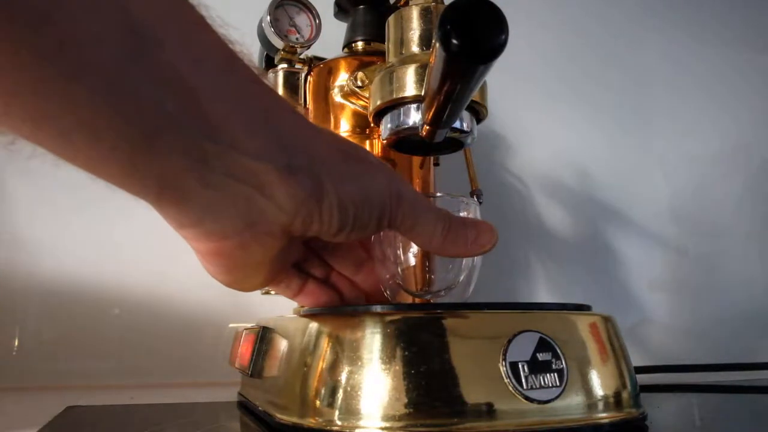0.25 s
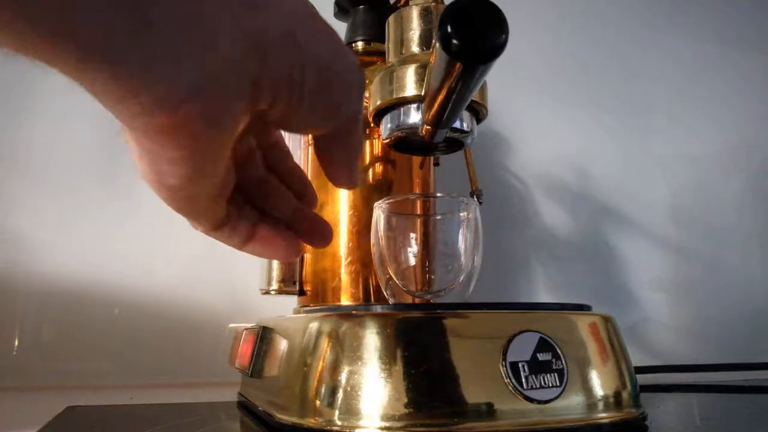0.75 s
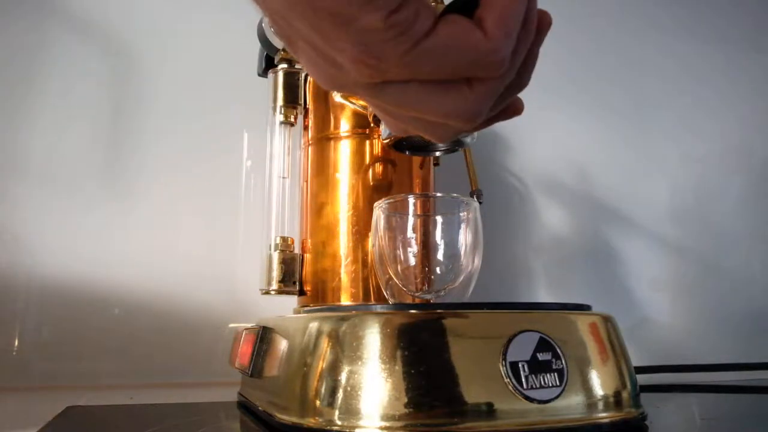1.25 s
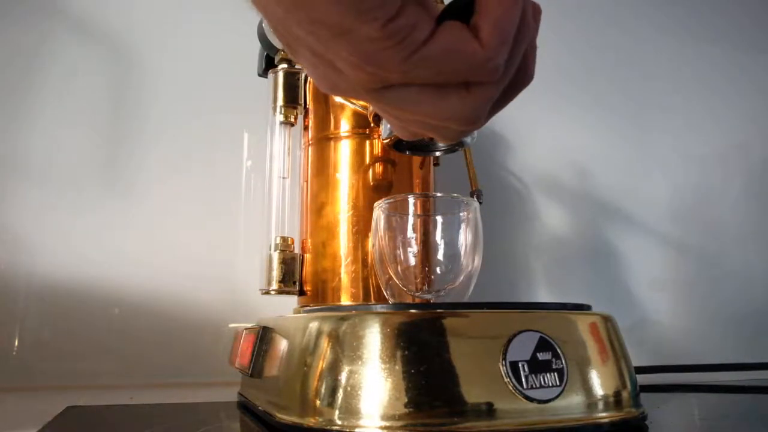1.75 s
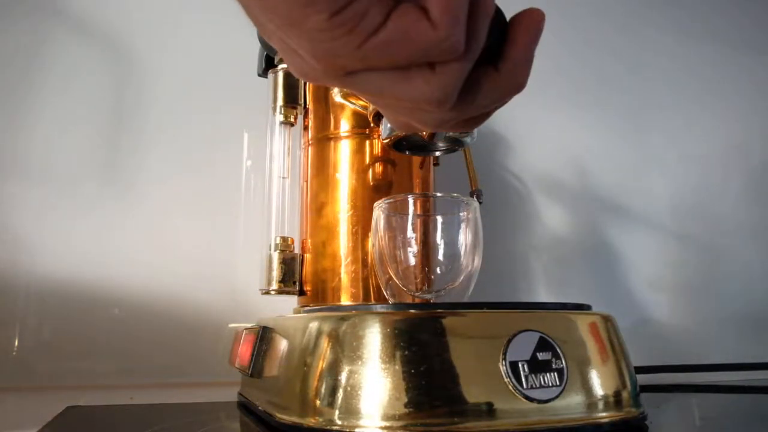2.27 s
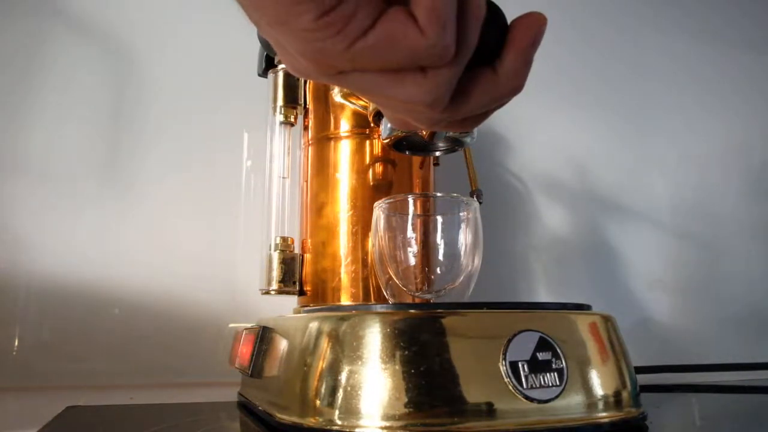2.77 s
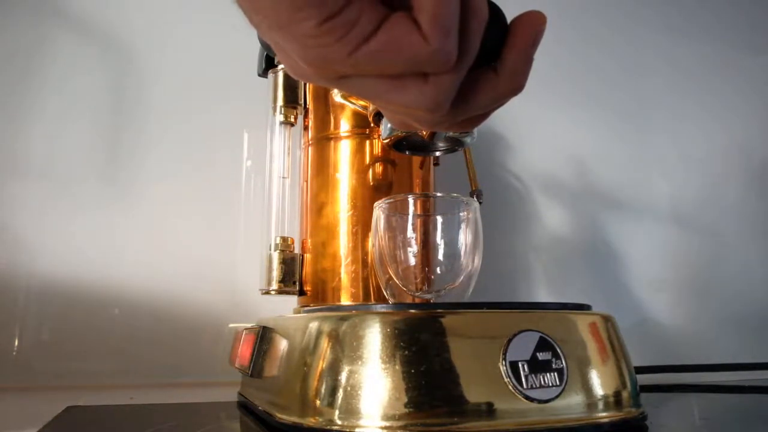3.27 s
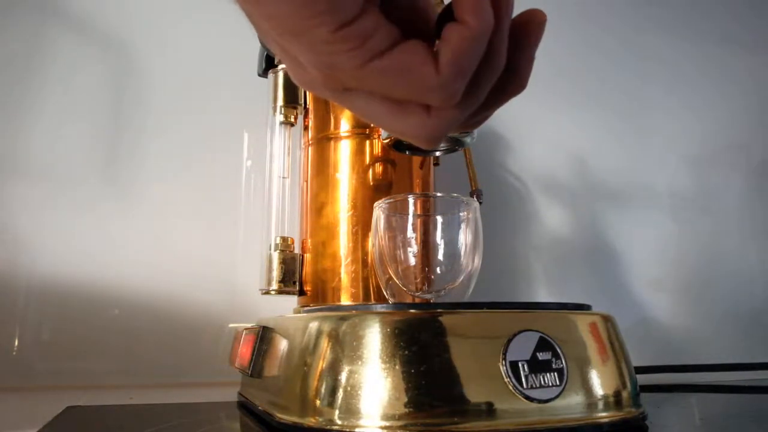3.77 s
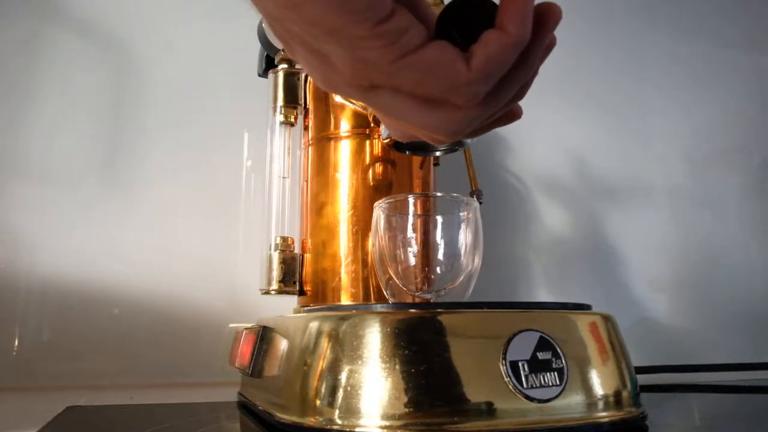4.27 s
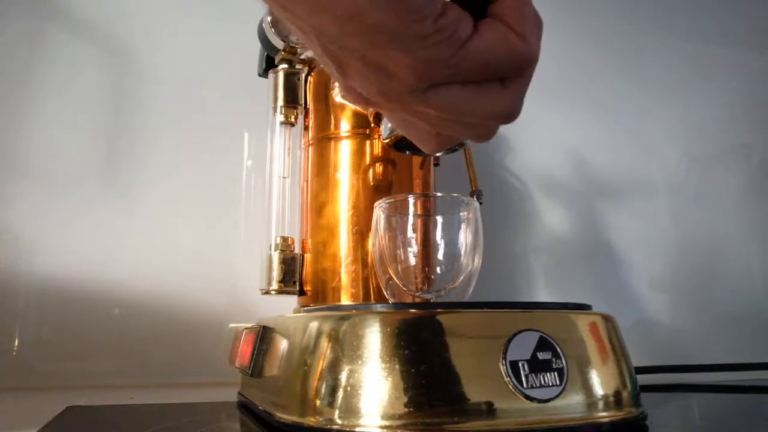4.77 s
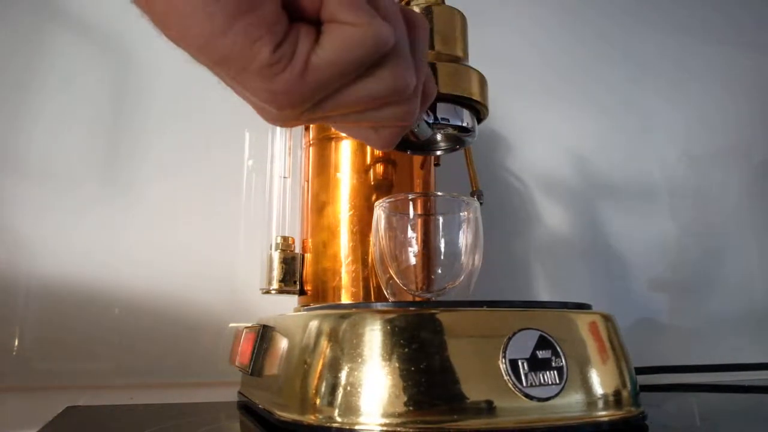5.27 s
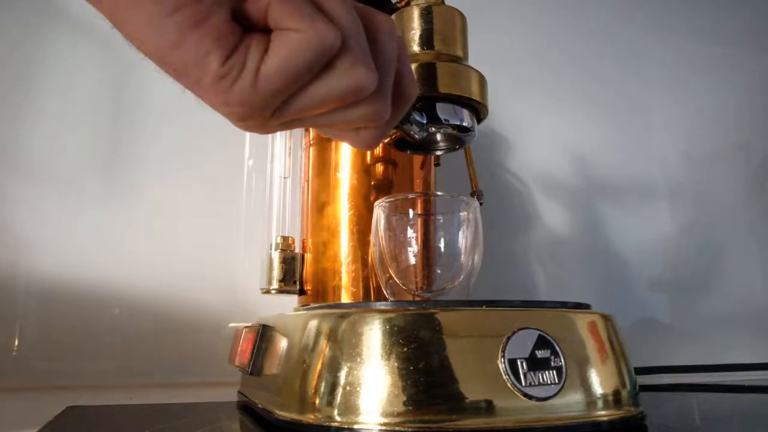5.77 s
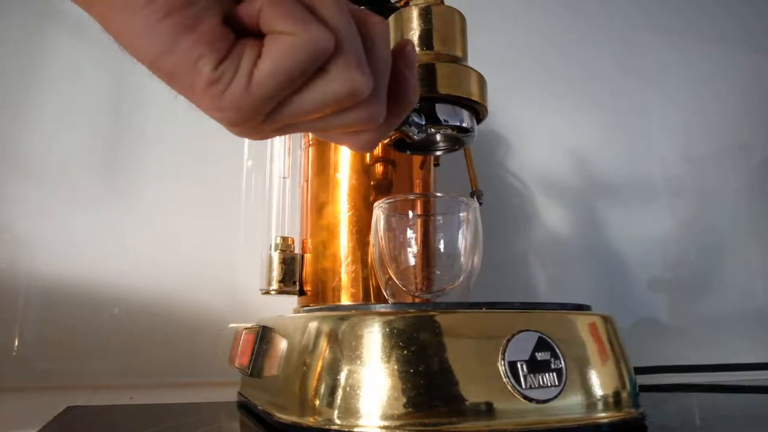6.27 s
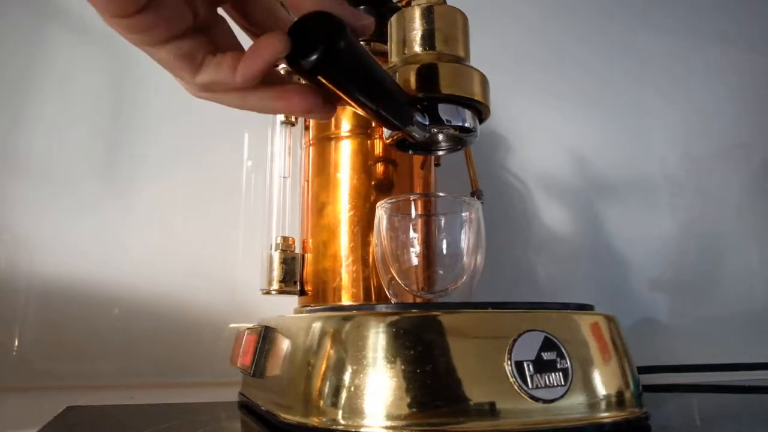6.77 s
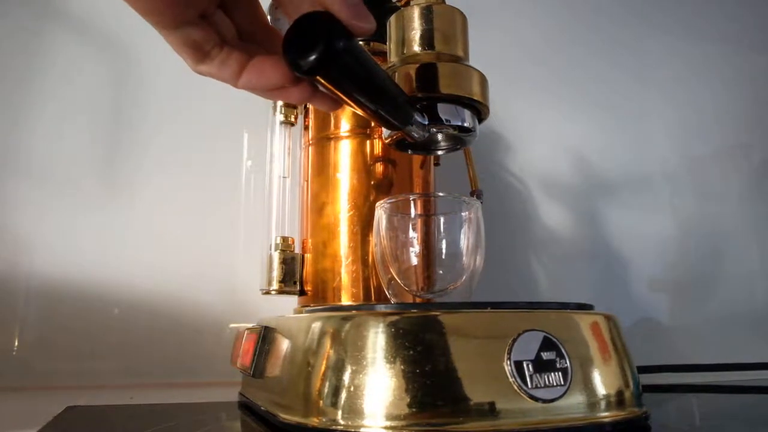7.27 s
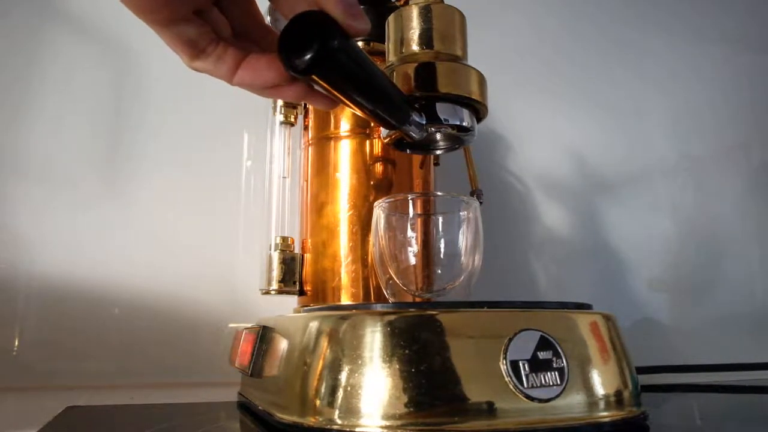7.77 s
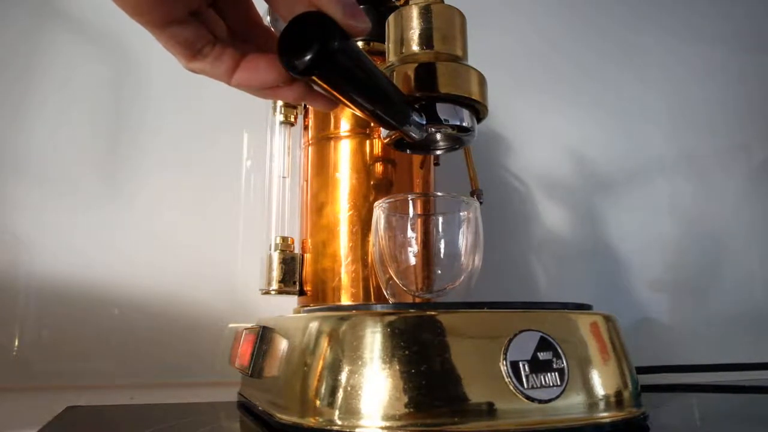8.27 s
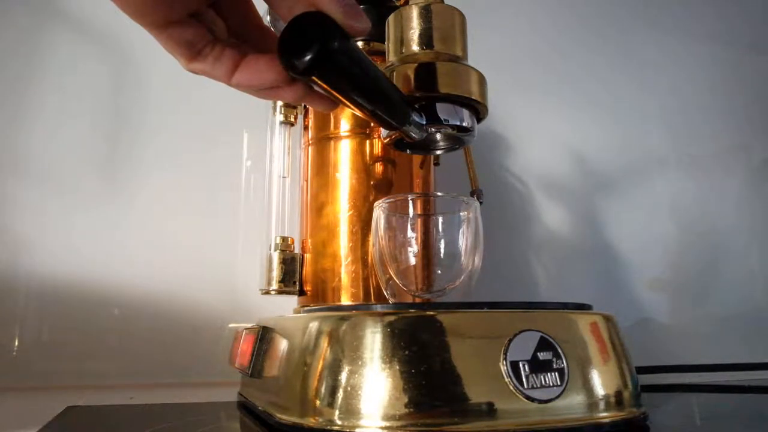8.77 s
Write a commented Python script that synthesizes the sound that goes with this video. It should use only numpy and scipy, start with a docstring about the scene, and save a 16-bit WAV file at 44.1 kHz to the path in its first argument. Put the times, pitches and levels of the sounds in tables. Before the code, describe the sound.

Metal handle knocks and clanks unevenly into the collar of a small espresso machine, with hollow thuds and short scrapes over a faint kitchen drone.

```python
"""In a kitchen, a camera with two microphones stands close to a small lever espresso machine on the counter.
Its handle is worked into the brass collar: decaying modes thud in the hollow base and counter and clank in
handle and collar, noise bursts tick where metal meets metal, and lugs scrape with uneven slips.
The kitchen adds diffuse echoes over a noise drone, whose middle wavers in level, and the microphones' hiss."""
import sys
import numpy as np
from scipy import signal
from scipy.fft import rfft, irfft, next_fast_len
from scipy.io import wavfile
from scipy.ndimage import uniform_filter1d

SR = 44100
rng = np.random.default_rng(int(sys.argv[2]) if len(sys.argv) > 2 else 0)


def inscribe(sig):
    """Save sig as 16-bit PCM at rate SR to the path in sys.argv[1].

    A 1-D sig is mono; a 2-D sig holds one channel per row.
    Samples are clipped to [-1, 1] before scaling.
    """
    pcm = np.round(np.clip(np.atleast_2d(sig).T, -1, 1) * 32767)
    wavfile.write(sys.argv[1], SR, pcm.astype(np.int16))


N = 398204

# Room drone. Each row: frequency in Hz, relative density in dB per Hz.
DRONE_SPECTRUM = [(12, -39), (20, -36), (38, -7), (64, -2.5), (90, 1), (232, -2), (306, 0.5), (342, -6.5),
                  (393, 0), (491, -20), (534, -5), (834, -9), (1300, -11.5), (1450, -12), (15500, -42.5)]
# Narrow humps on the drone. Each row: centre in Hz, width in Hz, relative density in dB per Hz.
DRONE_HUMPS = [(379, 310, -1.5), (1297, 152, -3), (1563, 20, -4.5)]
# Likeness of the drone at the two microphones. Each row: frequency in Hz, left-right correlation.
MICROPHONE_LIKENESS = [(30, 1), (130, 0.24), (300, 0.82), (640, 0.44), (1400, 0.9), (3100, 0.15),
                       (7000, 0.06), (15000, .03)]

# A lug grazes the collar just before it seats. Each row: start in seconds, level in dB, length in ms.
GRAZES = [(1.054, -34, 9.8), (3.879, -38.5, 16), (4.103, -27, 16), (4.645, -34, 25), (4.939, -39, 25)]
# The lugs slide in the collar: one list per slide. Each row: time in seconds, level in dB.
SLIDES = [
    [(1.1, -62), (1.254, -64), (1.44, -59)],
    [(4.68, -66), (4.828, -46), (5.104, -49.5), (5.46, -64)],
    [(6.14, -52), (6.308, -53), (6.42, -59)],
    [(7.27, -41), (7.474, -64.5), (7.62, -58)],
]
# Metal knocks. Each row: start in seconds, thud level in dB, push in degrees from vertical (90 at most is used),
# clank level in dB, hardness from 0 to 1, the collar's favoured pitch in Hz.
KNOCKS = [(1.0627, -35, 39, -32.5, 0.14, 1800), (1.4487, -30.5, 35, -30.5, 0.13, 1435),
          (1.6226, -24.5, 37, -28.5, 0.77, 1850), (1.7051, -15, 43, -24.5, 0.64, 1630),
          (2.0484, -31, 38, -33, 0.34, 1470), (2.1165, -22, 36, -27.5, 0.72, 1188),
          (3.8946, -23.5, 48, -25.5, 0.72, 1430), (4.1121, -22.5, 55, -27, 0.68, 1410),
          (4.1639, -31, 7.6, -38.5, 0.2, 1340), (4.6614, -18.5, 50, -27, 0.43, 1170),
          (4.6966, -41, 12, -34.5, 0.1, 1830), (4.7466, -17, 59, -23.5, 0.61, 1360),
          (4.8233, -23.5, 18, -39, 0.57, 1360), (4.9692, -22.5, 69, -34, .3, 1870),
          (5.2736, -39, 63, -44, .45, 1670), (5.6247, -23, 69, -39.5, 0.1, 1220),
          (5.675, -26.5, 49, -37, 0, 1350), (5.971, -36.5, 89, -40, 0.69, 1860),
          (6.1274, -15.5, 72, -36, 0.1, 1450), (6.1518, -11.5, 32, -20, 0.59, 1350),
          (6.2153, -14, 65, -19, 0.64, 1900), (6.2568, -20, 13, -28.5, 0.67, 1930),
          (6.548, -27, 11, -35.5, 0.52, 1360), (6.587, -53, 18, -48, 0.87, 1270),
          (6.718, -53, 42, -54, 1, 1330), (6.8665, -27.5, 30, -32, 0.76, 1426),
          (7.0255, -25, 44, -29, 0.72, 1870), (7.0489, -28.5, 6.3, -38, .75, 2080),
          (7.1323, -27, 40, -32, 0.75, 1810), (7.2671, -27.5, 77, -37, 0.62, 1930),
          (7.3007, -16.5, 48, -45, 0.2, 1390), (7.3969, -13, 110, -34, 0.45, 1480),
          (7.446, -17, 85, -36, 0.62, 1530), (7.5143, -21.5, 39, -34, 0.44, 1327),
          (7.9338, -12, 60, -30, 0.24, 1600), (7.9518, -11.5, 77, -33, 0.2, 1280),
          (8.0071, -22.5, 4.5, -31, 0.38, 1360)]
# Soft bumps of the hand shifting the machine.
# Each row: start in seconds, thud level in dB, push in degrees from vertical.
BUMPS = [(2.179, -45, 6), (3.69, -44, 20), (3.823, -33, 25), (3.96, -37, 19), (5.03, -33, 6.2),
         (5.105, -40, 24), (5.181, -35, 8.6), (5.212, -31.5, 10), (5.513, -31, 10), (5.612, -19, 77),
         (5.727, -48, 51), (5.98, -27.5, 8), (6.038, -33.5, 24), (6.095, -34, 11), (6.304, -47, 14),
         (6.352, -35, 36), (6.497, -42, 51), (6.751, -39, 5), (7.283, -17.5, 52), (7.718, -32.5, 20),
         (7.794, -36.5, 18), (8.266, -51.5, 58)]

# Modes of the parts, before ring() tapers the levels and the damping shortens the decays.
# Brass collar. Each row: frequency in Hz, relative level in dB, undamped t60 in seconds.
COLLAR_MODES = [(1145, -15, 0.1), (1348, 1.5, 0.055), (1446, -5, 0.036), (1520, -4, 0.1),
                (1640, -3.5, 0.037), (1851, -3, 0.085), (2127, -5, 0.054)]
# Handle. Each row: frequency in Hz, relative level in dB, undamped t60 in seconds.
HANDLE_MODES = [(635, 16.5, 0.023), (718.6, -1.5, 0.45), (769.6, 0.5, 0.46), (787, -6.5, 0.27),
                (1003, 8, 0.2)]
# Steel rim of the basket. Each row: frequency in Hz, relative level in dB, undamped t60 in seconds.
RIM_MODES = [(2200, 6, 0.032), (2590, 8, 0.099), (3054, 7, 0.1), (3313, 0, 0.094), (3740, -11, 0.049),
             (3740, -39.5, 0.02), (4550, -34, .06)]
# Side wall of the hollow base. Each row: frequency in Hz, relative level in dB, undamped t60 in seconds.
WALL_MODES = [(347, -11, .2), (370, 0, .3), (412, -12, .16)]
# Drip tray. Each row: frequency in Hz, relative level in dB, undamped t60 in seconds.
TRAY_MODES = [(472, -9, .16), (492, 0, .26)]
# Counter under the feet. Each row: frequency in Hz, relative level in dB, undamped t60 in seconds.
COUNTER_MODES = [(176, -2, .26), (222, -10, .14), (262, -6, .2), (282, 0, .3), (310, -7, .2)]

# Kitchen echoes. Each row: lowest Hz, highest Hz, level in dB, t60 in seconds,
# share that differs between the microphones.
KITCHEN_BANDS = [(60, 430, -11, 0.67, .2), (580, 1040, -9.5, 0.75, .25), (1420, 3900, -9.5, 0.47, 0.25),
                 (3550, 13000, -10.5, 0.33, .5)]

DRONE_DB = -52
WAVER_DB, WAVER_HZ = 2.5, 5  # rms of the waver, new levels per second
SPOT_DB, DETUNE = 1.8, .005  # rms spread of mode level and relative tuning from blow to blow
FAVOUR_DB, FAVOUR_OCTAVES = 15.5, 0.072  # the struck spot lifts the collar modes near one pitch
SMEAR_DB = -7
KNOCK_RING, BUMP_RING, RIM_RING = 0.59, 0.68, .6  # factors on t60
THUD_RING = 0.89  # factor on t60: the hand damps the base
BLUR_DB, BLUR_T60_S = -15, 0.27  # the base's panels blur around the clear modes
CONTACT_MS, BUMP_CONTACT_MS = 1.73, 11
BUMP_HANDLE_DB, BUMP_TRAY_DB = -7, -18  # relative to the thud
# handle and tray lie between thud and clank: share of the clank's level, dB added
HANDLE_SHARE, HANDLE_DB, TRAY_SHARE, TRAY_DB = 0.3, -4, 0.37, -6
# rim and tick relative to the clank for the softest contact, and what the hardest adds
RIM_SOFT_DB, RIM_HARD_DB, TICK_SOFT_DB, TICK_HARD_DB = -28, 30, -52.5, 27.5
HARD_HANDLE_DB = -4.5  # a soft contact goes into the handle more
# a hard contact jolts the tray and the counter's lowest mode more
HARD_TRAY_DB, HARD_LOW_DB, SOFT_LOW_DB = 9, 11.5, -9.5
KNOCK_PAN_DB = .9  # left over right
TOP_HZ = 15700


def undb(db):
    """Amplitude factor for a level in dB."""
    return 10 ** (np.asarray(db) / 20)


def unit(x):
    """Scale to an rms of 1."""
    return x / np.sqrt(np.mean(x ** 2))


def band(x, lo_hz, hi_hz, order=2):
    """Keep the band between two frequencies."""
    return signal.sosfilt(signal.butter(order, [lo_hz, hi_hz], "bandpass", fs=SR, output="sos"), x)


def fade(t, t60):
    """Exponential decay by 60 dB in t60 seconds."""
    return np.exp(-np.log(1000) * t / t60)


def rise(t, contact_ms):
    """A longer contact lets the ring grow in more gently."""
    return np.sin(np.pi / 2 * np.minimum(t / (contact_ms * 1e-3 + 1e-4), 1)) ** 2


def ring(modes, t, stretch, chance, neighbour=-0.8):
    """Decaying modes, varied for this one blow; each next gain is scaled by neighbour, squared gains sum to 1."""
    hz, db, t60 = np.transpose(modes)[:, :, None]
    spot, tune = chance[:len(modes)].T[:, :, None]
    # a negative neighbour puts adjacent modes out of phase
    taper = neighbour ** np.arange(len(modes))[:, None]
    gain = undb(db + SPOT_DB * spot) * taper
    tuned_hz = hz * (1 + DETUNE * tune)
    waves = gain * np.sin(2 * np.pi * tuned_hz * t) * fade(t, t60 * stretch)
    return waves.sum(axis=0) / np.sqrt(np.sum(gain ** 2))


def smear(modes, db, t, noise, t60):
    """The many modes of a part that lie too close to tell apart blur into noise over its range."""
    blurred = unit(band(noise, 0.87 * modes[0][0], 0.98 * modes[-1][0], order=3))
    return undb(db + SMEAR_DB) * blurred * fade(t, t60)


def drone():
    """Room noise with a few narrow humps; the hiss at the top differs between microphones."""
    size = next_fast_len(N)
    hz = np.maximum(np.arange(size // 2 + 1) * SR / size, 1)

    def on_hz(table):
        """Interpolate a table over log frequency."""
        table_hz, values = np.transpose(table)
        return np.interp(np.log(hz), np.log(table_hz), values)

    power = undb(on_hz(DRONE_SPECTRUM)) ** 2
    for centre_hz, width_hz, db in DRONE_HUMPS:
        power = power + undb(db) ** 2 / (1 + (2 * (hz - centre_hz) / width_hz) ** 2) ** 2
    alike = np.clip(on_hz(MICROPHONE_LIKENESS), 0, 1)
    shares = np.array([1 + alike, 1 - alike])
    mid, side = rfft(rng.standard_normal((2, size))) * np.sqrt(power * shares)
    # the machine side of the room is a little louder on the left
    tilt = undb(np.array([alike, -alike]) * .45)
    pair = irfft(np.array([mid + side, mid - side]) * tilt, size)[:, :N]
    # the drone around 1100-2200 Hz wavers in level
    step = int(SR / WAVER_HZ)
    levels = np.repeat(rng.standard_normal(N // step + 1), step)
    walk = unit(uniform_filter1d(levels, step)[:N])
    pair = pair + (undb(WAVER_DB * walk) - 1) * band(pair, 1100, 2200, order=1)
    return undb(DRONE_DB) * pair / np.sqrt(np.mean(pair.mean(axis=0) ** 2))


def scrape():
    """Uneven slips of brass on steel set all parts but the tray ringing faintly."""
    t, now = np.arange(SR // 6) / SR, np.arange(N) / SR
    press = np.zeros(N)
    for slide in SLIDES:
        slide_s, slide_db = np.transpose(slide)
        press += undb(np.interp(now, slide_s, slide_db, left=-120, right=-120))
    for s, db, ms in GRAZES:
        press += undb(db) * ((now > s) & (now < s + ms * 1e-3))
    slips = rng.standard_normal(N) * undb(2.2 * rng.exponential(size=N))
    parts = ((COLLAR_MODES, 0), (HANDLE_MODES, -2.5), (RIM_MODES, -12), (WALL_MODES, 3.0), (COUNTER_MODES, 1.5))
    body = sum(undb(db) * ring(modes, t, 0.45, rng.standard_normal((8, 2))) for modes, db in parts)
    return signal.fftconvolve(press * unit(slips), body / np.sqrt(np.sum(body ** 2)))[:N]


def thud(thud_db, degrees, tray_db, contact_ms, stretch, hardness=0.45):
    """The push travels down the column: sideways it moves the wall of the base, downward the counter."""
    t, chance = np.arange(SR // 3) / SR, rng.standard_normal((3, 8, 2))
    angle = np.radians(np.clip(degrees, 0, 90))
    (low_hz, low_db, low_t60), *rest = COUNTER_MODES
    counter = [(low_hz, low_db + SOFT_LOW_DB + HARD_LOW_DB * hardness, low_t60)] + rest
    parts = (
        (WALL_MODES, undb(thud_db) * np.sin(angle)),
        (TRAY_MODES, undb(tray_db)),
        (counter, undb(thud_db) * np.cos(angle)),
    )
    modes = sum(gain * ring(part, t, THUD_RING * stretch, c, 0.94) for (part, gain), c in zip(parts, chance))
    panels = unit(band(rng.standard_normal(len(t)), 230, 473, order=3))
    blur = undb(thud_db + BLUR_DB) * panels * fade(t, BLUR_T60_S)
    return rise(t, contact_ms) * (modes + blur)


def knock(thud_db, degrees, collar_db, hardness, spot_hz):
    """Metal on metal: a thud, a clank of handle, collar and rim, and a tick; hardness wakes rim and tick."""
    t = np.arange(SR // 6) / SR
    chance, noise = rng.standard_normal((3, 8, 2)), rng.standard_normal((4, len(t)))
    stretch, clank_over_thud = KNOCK_RING, collar_db - thud_db
    handle_db = thud_db + HANDLE_SHARE * clank_over_thud + HANDLE_DB + HARD_HANDLE_DB * (hardness - .5)
    tray_db = thud_db + TRAY_SHARE * clank_over_thud + TRAY_DB + HARD_TRAY_DB * (hardness - .5)
    rim_db = collar_db + RIM_SOFT_DB + RIM_HARD_DB * hardness
    tick_db = collar_db + TICK_SOFT_DB + TICK_HARD_DB * hardness
    collar = []
    for hz, db, t60 in COLLAR_MODES:
        octaves = np.log2(hz / spot_hz)
        collar.append((hz, db + FAVOUR_DB * np.exp(-(octaves / FAVOUR_OCTAVES) ** 2), t60))
    metal = undb(handle_db) * ring(HANDLE_MODES, t, stretch, chance[0])
    metal += smear(HANDLE_MODES, handle_db, t, noise[0], 0.18 * stretch)
    metal += undb(collar_db) * ring(collar, t, stretch, chance[1])
    metal += smear(COLLAR_MODES, collar_db, t, noise[1], 0.2 * stretch)
    metal += undb(rim_db) * ring(RIM_MODES, t, RIM_RING * stretch, chance[2])
    metal += smear(RIM_MODES, rim_db, t, noise[2], 0.08 * stretch)
    tick = unit(band(noise[3], 3100, 9400)) * (fade(t, 0.014) + 0.22 * fade(t, 0.12))
    out = thud(thud_db, degrees, tray_db, CONTACT_MS, stretch, hardness)
    # the light parts answer the contact faster than the heavy base
    out[:len(t)] += rise(t, 0.052 * CONTACT_MS) * metal + undb(tick_db) * tick
    return out


def bump(thud_db, degrees):
    """Skin on the machine: a slow thud and a dull ring of the handle."""
    out = thud(thud_db, degrees, thud_db + BUMP_TRAY_DB, BUMP_CONTACT_MS, BUMP_RING)
    t = np.arange(len(out)) / SR
    ringing = ring(HANDLE_MODES, t, BUMP_RING, rng.standard_normal((8, 2)))
    return out + rise(t, BUMP_CONTACT_MS) * undb(thud_db + BUMP_HANDLE_DB) * ringing


def machine():
    """All knocks, bumps and scrapes in time; so small a machine radiates little deep bass."""
    out = np.zeros(N + SR)
    for table, play in ((KNOCKS, knock), (BUMPS, bump)):
        for s, *blow in table:
            sound, start = play(*blow), int(s * SR)
            out[start:start + len(sound)] += sound
    return band(out[:N] + scrape(), 169, 18000, order=3)


def kitchen(x):
    """Diffuse echoes that build up after the nearest wall, partly different at the two microphones."""
    t, echo = np.arange(SR) / SR, 0
    build_up = np.clip((t - .004) / 0.0029, 0, 1)
    for lo_hz, hi_hz, db, t60, apart in KITCHEN_BANDS:
        mid, side = band(rng.standard_normal((2, SR)), lo_hz, hi_hz) * fade(t, t60) * build_up
        # each band returns its given share of the energy
        scale = undb(db) * np.sqrt(2 * (hi_hz - lo_hz) / SR / np.sum(mid ** 2))
        echo = echo + scale * (mid + apart * side * np.array([[1], [-1]]))
    return signal.fftconvolve(x[None], echo, axes=1)[:, :N]


def scene():
    """The machine and its echoes, slightly left, over the room drone."""
    dry_machine = machine()
    pan = undb(np.array([[1], [-1]]) * KNOCK_PAN_DB / 2)
    return (dry_machine + kitchen(dry_machine)) * pan + drone()


def record(dry):
    """The camera cuts the top with a steep low-pass."""
    return signal.sosfilt(signal.ellip(10, .2, 80, TOP_HZ, fs=SR, output="sos"), dry)


dry = scene()
out = record(dry)
inscribe(out)
```